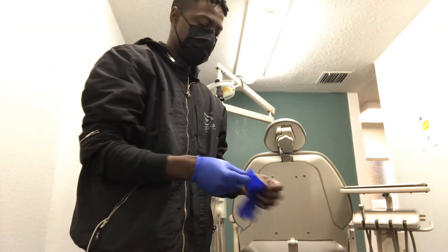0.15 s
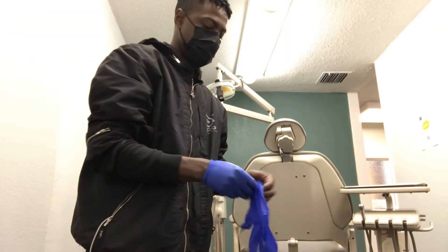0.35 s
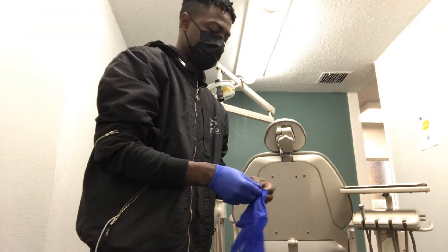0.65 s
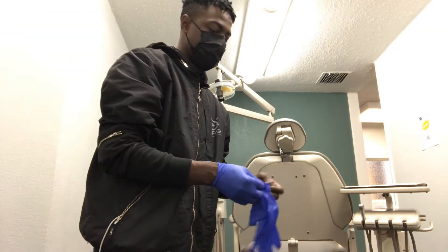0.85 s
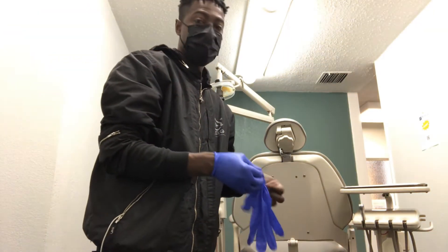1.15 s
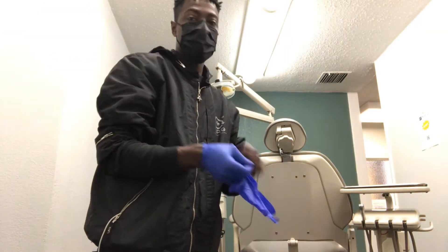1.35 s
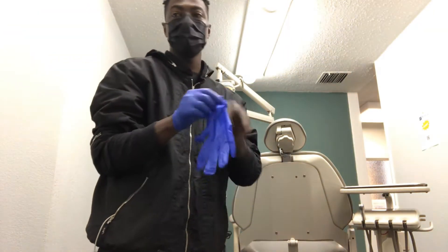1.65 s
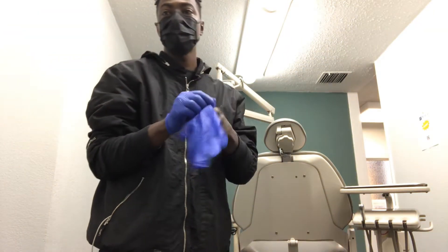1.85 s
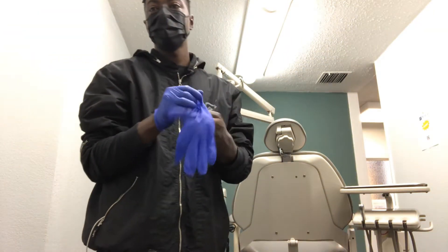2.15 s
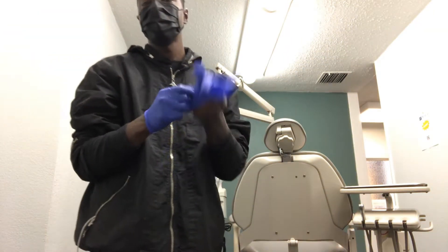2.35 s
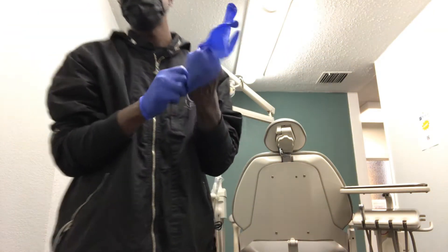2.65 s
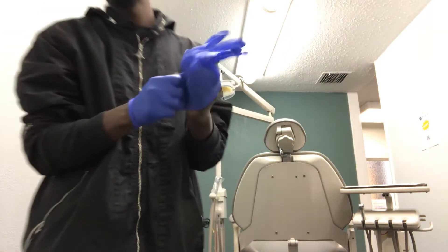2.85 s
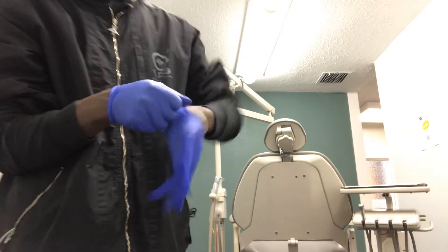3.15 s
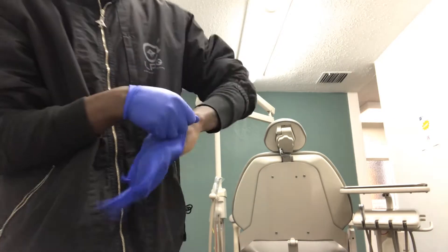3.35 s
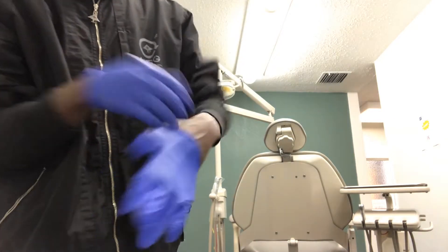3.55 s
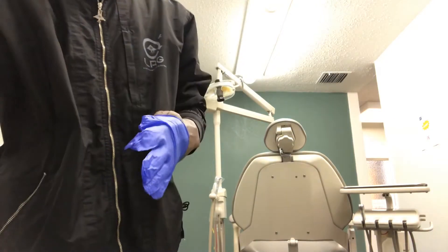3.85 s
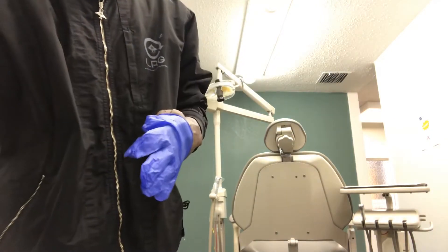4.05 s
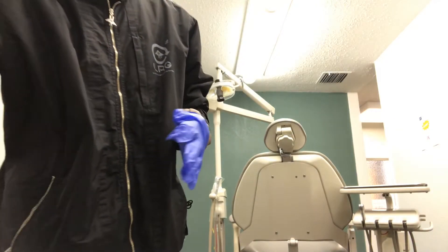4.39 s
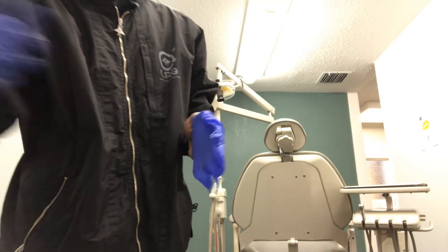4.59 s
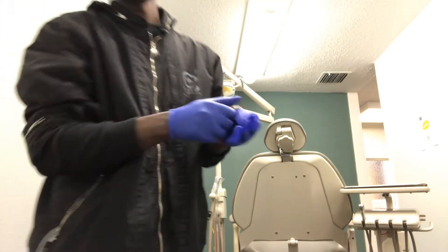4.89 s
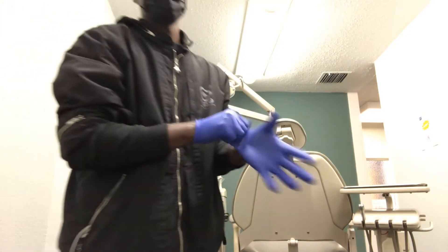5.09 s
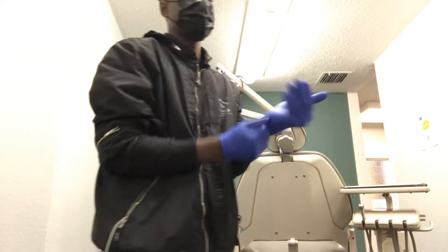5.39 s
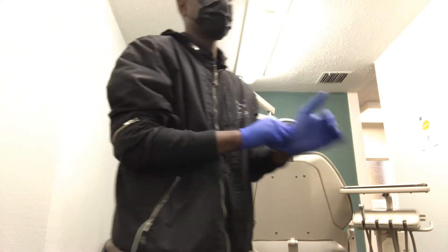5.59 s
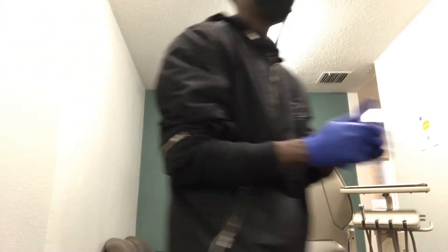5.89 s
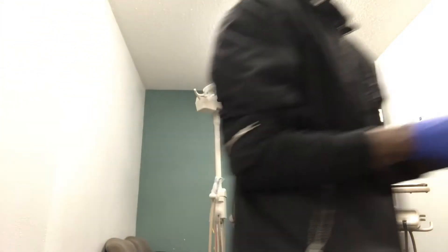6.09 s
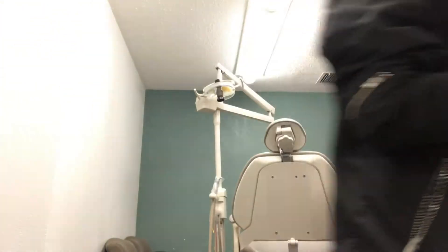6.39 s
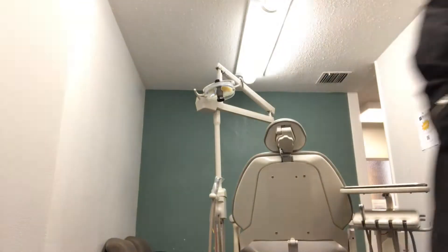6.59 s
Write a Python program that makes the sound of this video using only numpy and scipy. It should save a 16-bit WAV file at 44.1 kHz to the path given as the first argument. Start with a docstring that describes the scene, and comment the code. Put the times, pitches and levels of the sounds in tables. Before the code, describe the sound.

Thin rubber gloves rustle, rub and crinkle in a small hard room, with four sharp cuff snaps over low ventilation hum, then soft footfalls.

```python
"""A thin rubber glove is pulled onto a hand in a small, hard-walled room, over ventilation hum, moving
air and a low boom that swells and fades: tones, coloured noise and one wavering sine.
From the start sleeves swish and rubber rubs, hisses and soon crinkles: noise with stick-slip ticks and
short bursts. Later it judders (resonant noise), and the cuff snaps loud, lighter, loud, loud (dispersed
clicks), with two hollow puffs of air (sines). Last come two soft footfalls (low resonant noise)."""
import sys
import numpy as np
from scipy import signal
from scipy.fft import rfft, irfft, next_fast_len
from scipy.io import wavfile
from scipy.ndimage import uniform_filter1d, map_coordinates

SR = 44100
rng = np.random.default_rng(int(sys.argv[2]) if len(sys.argv) > 2 else 0)


def put_to_file(sound):
    """Save the sound as 16-bit audio at rate SR, in the file named by the first command-line argument."""
    columns = np.atleast_2d(sound).T  # one column per channel
    safe = np.clip(columns, -1, 1)
    whole_steps = np.round(safe * 32767)
    wavfile.write(sys.argv[1], SR, whole_steps.astype(np.int16))


N = 296793

# spectra of loose rubber, taut rubber and dull cloth or scuffing: freq_hz, density_db (per Hz, relative)
RUBBER = [(400, -52), (1100, -6), (1900, 2), (2800, 1), (3800, 0.5), (5000, -3), (6300, -5.5),
          (8000, -16.5), (10500, -26.5), (16000, -59)]
TAUT = [(3000, -31), (6000, 0), (8000, -3.5), (10300, -5.5), (13000, -1.5), (15500, -5)]
DULL = [(150, -4.5), (250, -1), (650, 0), (1400, 1.5), (2200, -5.5), (4000, -10.5), (9000, -73)]


def amp(db):
    """Amplitude ratio of a level in dB."""
    return 10 ** (np.asarray(db) / 20)


def unit(x):
    """x at rms 1."""
    return x / np.sqrt(np.mean(x ** 2) + 1e-20)


def along(points, hz):
    """Interpolate (Hz, value) points on a log frequency axis."""
    point_hz, value = np.transpose(points)
    return np.interp(np.log(hz + 1), np.log(point_hz + 1), value)


def wobble(rate_hz):
    """Smooth random curve through rate_hz normally distributed knots a second."""
    knots = rng.standard_normal(int(N * rate_hz / SR) + 4)
    return map_coordinates(knots, [np.arange(N) * rate_hz / SR])


def filtered(x, response):
    """x times a response of frequency, in the spectrum."""
    size = next_fast_len(N + SR // 2)
    return irfft(rfft(x, size) * response(np.fft.rfftfreq(size, 1 / SR)), size)[:N]


def coloured(x, spectrum):
    """x shaped by a spectrum, at rms 1."""
    return unit(filtered(x, lambda hz: amp(along(spectrum, hz))))


def pulse(spectrum, size=2048):
    """Minimum-phase pulse, the sharpest causal one with this spectrum, at energy 1."""
    hz = np.fft.rfftfreq(size, 1 / SR)
    cepstrum = irfft(np.log(amp(along(spectrum, hz))))
    cepstrum[1:size // 2] *= 2
    cepstrum[size // 2 + 1:] = 0
    p = irfft(np.exp(rfft(cepstrum)))
    return p / np.linalg.norm(p)


def add(track, start_s, sound):
    """Mix a sound into the track, cut at the track's end."""
    part = track[round(start_s * SR):][:len(sound)]
    part += sound[:len(part)]


def room(x, wet_db, onset_s=0.00041):
    """x, a few early reflections and a diffuse tail whose bands decay at their own rates."""
    # wall decay: freq_hz, t60_s
    wall_decay = [(130, 0.53), (400, 0.28), (1000, 0.36), (2800, 0.3), (7500, 0.33), (14000, 0.27)]
    # starting level of the tail: freq_hz, gain_db
    wall_gain = [(150, 10.5), (600, 4.5), (2000, 1.5), (7500, 5.5), (12000, -0.5)]
    # reflections off the nearest surfaces: delay_s (nominal), level_db (relative to the tail)
    reflections = [(.0037, -20), (.0062, -8), (.0094, -19), (0.0147, -16)]
    hz, t, z = signal.stft(rng.standard_normal(SR * 2 // 3), SR, nperseg=256)
    decay_db = 60 * t / along(wall_decay, hz)[:, None]
    level_db = along(wall_gain, hz)[:, None] - decay_db
    tail = signal.istft(z * amp(level_db), SR, nperseg=256)[1]
    tail *= 1 - np.exp(-(np.arange(len(tail)) / SR / onset_s) ** 2)
    tail /= np.linalg.norm(tail)
    for delay_s, db in reflections:
        jitter = 1 + 0.11 * rng.uniform(-1.1, 1)  # each sound gets slightly different reflection delays
        add(tail, delay_s * jitter, amp(db) * np.ones(2) / 2)  # slightly dulled by the surface
    response = amp(wet_db) * tail
    response[0] += 1
    return signal.fftconvolve(x, response)


def contact(fade_s, flutter, grain_db, size=4096):
    """A click plus grainy fading flutter, levelled to a nearly flat spectrum, at energy 1."""
    fade = np.exp(-np.arange(size) / SR / fade_s)
    burst = rng.standard_normal(size) * fade * amp(grain_db * rng.standard_normal(size))
    burst *= np.sqrt(flutter) / np.linalg.norm(burst)
    burst[0] += np.sqrt(1 - flutter)
    for _ in range(4):  # level the spectrum while keeping the burst short
        flat = irfft(np.exp(1j * np.angle(rfft(burst))))
        burst = flat * fade ** 0.25
    return burst / np.linalg.norm(burst)


def resonate(x, hz, width_hz, size=4096):
    """x through one steep-sided (double-pole) resonance, at energy 1."""
    t = np.arange(size) / SR
    ring = t * np.exp(-1.5 * np.pi * width_hz * t) * np.sin(2 * np.pi * hz * t)
    y = signal.fftconvolve(x, ring)
    return y / np.linalg.norm(y)


def resonant_swells(rows, wet_db):
    """Each row is a short swell of noise sounding a resonance in the room."""
    out = np.zeros(N)
    for start_s, length_s, hz, width_hz, db in rows:
        count = int(length_s * SR)
        push = rng.standard_normal(count) * np.sin(np.pi * np.arange(count) / count)
        add(out, start_s, amp(db) * room(resonate(push, hz, width_hz), wet_db))
    return out


def hum():
    """Steady tones of motors and mains."""
    # freq_hz, level_db (rms)
    tones = [(49.7, -53), (59.1, -49.5), (119.9, -55), (199.5, -70.5), (211.5, -70)]
    t = np.arange(N) / SR
    return sum(amp(db) * unit(np.sin(2 * np.pi * (hz * t + rng.random()))) for hz, db in tones)


def ventilation(level_db=-51.5):
    """Moving air: steady noise, mostly low."""
    # freq_hz, density_db (per Hz, relative)
    air_spectrum = [(20, -51), (30, -26), (42, 13), (70, -5.5), (125, 3), (180, -6), (270, -9.5),
                    (400, -13), (700, -18), (1400, -24), (3000, -37.5), (6500, -31.5), (10000, -39.5),
                    (16000, -56)]
    return amp(level_db) * coloured(rng.standard_normal(N), air_spectrum)


def boom(boom_hz=129, wander_hz=4, rest_db=-52.5, waver_db=1.5):
    """A low room resonance: a sine that swells, lingers between swells and wavers in pitch."""
    # start_s, length_s, top_db (rms of the swell at its top)
    boom_swells = [(0.126, 0.13, -36.5), (0.24, 0.47, -44.5), (0.766, 0.12, -41), (0.926, 0.16, -35.5),
                   (1.063, 0.28, -38), (1.945, 0.16, -44), (2.602, 0.091, -31), (3.932, 0.18, -36.5),
                   (4.221, 0.054, -42), (4.38, 0.27, -40.5), (4.598, 0.13, -36.5), (5.186, 0.13, -40),
                   (5.7, 0.19, -43), (6.556, .2, -41.5)]
    t = np.arange(N) / SR
    swell = np.zeros(N)
    for start_s, length_s, db in boom_swells:
        swell += amp(db) * np.sin(np.pi * np.clip((t - start_s) / length_s, 0, 1))
    strength = np.hypot(swell, amp(rest_db + waver_db * wobble(9.6)))
    pitch_hz = boom_hz + wander_hz * wobble(14)
    return strength * unit(np.sin(2 * np.pi * np.cumsum(pitch_hz) / SR))


def footfalls():
    """Soft steps while walking off: low resonant noise swells."""
    # start_s, length_s, pitch_hz, width_hz, energy_db (dry)
    steps = [(5.96, 0.35, 55, 25, -12.5), (6.415, 0.053, 277, 132, -17)]
    return resonant_swells(steps, wet_db=-8.5)


def puffs():
    """The hand drives air out of the glove with a soft, hollow note: a sine under an arch."""
    out = np.zeros(N)
    # start_s, peak_db, pitch_hz, length_s
    puff_rows = [(2.599, -30, 112.6, 0.043), (3.983, -38.5, 267, 0.09)]
    for start_s, db, hz, length_s in puff_rows:
        t = np.arange(int(length_s * SR)) / SR
        add(out, start_s, amp(db) * np.sin(np.pi * t / length_s) * np.sin(2 * np.pi * hz * t))
    return out


def judders():
    """Rubber judders over the skin and sounds a stretched patch: resonant noise swells."""
    # start_s, length_s, pitch_hz, width_hz, energy_db (dry)
    judder_rows = [(2.466, 0.023, 1910, 250, -14), (2.53, 0.041, 1420, 900, -11.5),
                   (2.616, 0.013, 2010, 400, -20), (3.231, 0.0156, 2570, 447, -12.5),
                   (3.685, 0.034, 3600, 600, -31), (4.71, 0.052, 1500, 300, -14),
                   (5.002, 0.031, 1300, 500, -17.5), (5.084, 0.036, 1000, 300, -17.5)]
    return resonant_swells(judder_rows, wet_db=-8)


def slips(rate_hz, spread_db, share):
    """Tiny stick-slip ticks of unequal size, a share of the power, on smooth friction noise."""
    size = amp(spread_db * np.minimum(rng.standard_normal(N), 2))
    ticks = (rng.random(N) < rate_hz / SR) * rng.choice([-1, 1], N) * size
    return np.sqrt(share) * unit(ticks) + np.sqrt(1 - share) * rng.standard_normal(N)


def patchy(x, depth_db):
    """The colour of x shifts from moment to moment as the film changes shape."""
    z = signal.stft(x, nperseg=512)[2]
    field = uniform_filter1d(rng.standard_normal(z.shape), 7, 0)  # smooth over frequency
    field = uniform_filter1d(field, 9, 1)  # smooth over time
    return unit(signal.istft(z * amp(depth_db * unit(field)), nperseg=512)[1][:N])


def pulls(attack_s=0.023, arch_db=2.5, fade_db_per_s=254):
    """Rub and hiss strengths: each pull takes hold, arches over its middle and dies away."""
    # start_s, length_s, rub_db, hiss_rel_db (taut rubber relative to the rub, before the hiss trim)
    pull_rows = [(0.012, .14, -62.5, -3.5), (0.334, 0.074, -64, -1.5), (0.75, 0.2, -65.5, -6),
                 (0.961, 0.055, -60.5, 0.5), (1.057, 0.26, -59.5, -2.5), (1.568, 0.16, -73, -5),
                 (1.715, .11, -52.5, -9.5), (1.82, 0.26, -62.5, -2.5), (2.102, .17, -59.5, -5),
                 (2.269, 0.2, -57, -2), (2.42, 0.16, -53, -5.5), (2.803, 0.21, -60, 0.5),
                 (2.943, .055, -54, -5.5), (3.074, 0.16, -55.5, -3), (3.274, .22, -55.5, -7.5),
                 (3.56, 0.22, -62.5, -4), (4.53, 0.41, -68.5, -2), (4.696, 0.067, -49, -4),
                 (4.816, 0.28, -58, -5), (4.978, .11, -48.5, -6.5), (5.08, 0.11, -51.5, -15),
                 (5.202, 0.098, -55, -3), (5.387, 0.077, -52, -2), (5.568, 0.21, -62, 0),
                 (5.792, .11, -52, -11.5), (5.924, 0.21, -70.5, 6)]
    rub_power, hiss_power = np.zeros(N), np.zeros(N)
    t = np.arange(SR) / SR
    for start_s, length_s, db, taut_db in pull_rows:
        curve_db = -arch_db * (2 * np.minimum(t / length_s, 1) - 1) ** 2
        fade_db = -fade_db_per_s * np.maximum(t - length_s, 0)
        strength = np.minimum(t / attack_s, 1) * amp(db + curve_db + fade_db)
        add(rub_power, start_s, strength ** 2)
        add(hiss_power, start_s, (amp(taut_db) * strength) ** 2)
    return np.sqrt(rub_power), np.sqrt(hiss_power)


def sliding():
    """Cloth swishes; rubber creeps over skin in tiny slips and hisses when pulled taut."""
    # how briskly the arms move: time_s, move_db (before the swing is widened)
    arm_rows = [(0.0, -56.5), (0.19, -59), (0.62, -64.5), (1.37, -57.5), (2.13, -59.5), (2.42, -52),
                (2.55, -55), (2.64, -48.5), (2.9, -54), (3.24, -55), (4.09, -58.5), (4.22, -62.5),
                (4.44, -59.5), (4.65, -55), (4.95, -52.5), (6.0, -56), (6.47, -53), (6.73, -54.5)]
    arm_s, move_db = np.transpose(arm_rows)
    arm_db = np.interp(np.arange(N) / SR, arm_s, move_db)
    swing = 1.06  # the swish swings wider than the movement
    arm = amp(arm_db.mean() + swing * (arm_db - arm_db.mean()))
    pull, taut = pulls()

    sleeve = amp(1.6 * wobble(21)) * coloured(slips(rate_hz=400, spread_db=1, share=0.13), DULL)
    grip_db = 1.2 * wobble(45)  # the grip catches and lets go
    friction = room(slips(rate_hz=500, spread_db=6, share=0.45), wet_db=0)[:N]
    folds = room(slips(rate_hz=20, spread_db=2, share=1), wet_db=-6)[:N]  # small folds tick at random
    rub = amp(grip_db) * patchy(coloured(friction, RUBBER), depth_db=0.5)
    rub += amp(-7.5) * coloured(folds, RUBBER)
    hiss_trim_db = 3.5
    hiss = amp(hiss_trim_db + 0.93 * grip_db)
    hiss *= coloured(slips(rate_hz=3500, spread_db=9, share=0.14), TAUT)

    # arm movement and pulls drive each layer together; the sleeve is dragged along with each pull
    sleeve_strength = np.hypot(amp(-1.5) * arm, amp(-5.5) * pull)
    rub_strength = np.hypot(amp(-9.5) * arm, pull)
    hiss_strength = np.hypot(amp(-19.5) * arm, taut)
    return sleeve_strength * sleeve + rub_strength * rub + hiss_strength * hiss


def crinkles(trim_db=-3.5, scuff_db=-3, fizz_db=-7):
    """A fold lets go with a tick, and the film around it crumples for a moment."""
    # start_s, fade_s (nominal), level_db (before trim_db), bright_db (trades dull scuff for hiss)
    crinkle_rows = [(1.1002, 0.0015, -19.5, 4.5), (1.206, 0.0074, -22.5, 5), (1.3964, 0.02, -14.5, 3.5),
                    (2.0978, .001, -18, 2.5), (2.445, 0.0064, -14, -2.5), (2.4689, .006, -13.5, 0.5),
                    (2.5448, .0058, -16, 13), (2.6198, .006, -23, 2), (2.682, 0.0045, -16.5, 4),
                    (2.909, 0.023, -23, -14.5), (3.1292, .0035, -17.5, -1.5), (3.2358, 0.0053, -10, 6),
                    (3.512, 0.0011, -11, 6.5), (3.8719, 0.0027, -20, 1), (3.901, 0.0041, -14, -4),
                    (3.997, .006, -29, 2), (4.214, .004, -32, 8), (4.221, .018, -26.5, -4.5),
                    (4.711, 0.019, -13.5, -5.5), (4.7192, 0.0042, -9, 0), (4.747, 0.029, -17, -7),
                    (5.0048, 0.0022, -20, -4), (5.0102, 0.0017, -17.5, -8.5), (5.0853, 0.0024, -12.5, -3),
                    (6.3504, 0.013, -24.5, -8.5)]
    out = np.zeros(N)
    scuff, rub, fizz = pulse(DULL), pulse(RUBBER), pulse(TAUT)
    for start_s, fade_s, db, bright_db in crinkle_rows:
        parts = [(scuff, scuff_db - bright_db), (rub, 0), (fizz, fizz_db + bright_db)]
        for colour, part_db in parts:
            tick = signal.fftconvolve(contact(fade_s, flutter=0.926, grain_db=2.5), colour)
            add(out, start_s, amp(db + part_db + trim_db) * room(tick, wet_db=-5.5))
    return out


def dispersed(x, lag_s, knee_hz):
    """The film carries high notes fastest: the lows of a slap leave it lag_s later."""
    size = 2 * len(x)
    hz = np.fft.rfftfreq(size, 1 / SR)
    cycles = lag_s * knee_hz * (1 - np.exp(-hz / knee_hz))
    return irfft(rfft(x, size) * np.exp(-2j * np.pi * cycles))[:len(x)]


def snaps(wet_trim_db=-2.5):
    """The stretched cuff slaps the skin and flutters against it for a moment."""
    # start_s, level_db (dry), fade_s (nominal), flutter (0-1, nominal), wet_db (before wet_trim_db)
    snap_rows = [(2.691, 5, 0.0034, 0.74, -2.5), (3.4639, -3, 0.0015, 0.8, -5.5),
                 (3.9428, 5.5, 0.0005, 0.4, -1.5), (5.4752, 2.5, 0.00046, 0.3, -3.5)]
    # cuff spectra, by how it is stretched and where it lands: freq_hz, density_db (per Hz, relative)
    tight = [(60, -12), (250, -10), (420, 0), (700, -7.5), (1020, -0.5), (1450, -13.5), (1900, 3.5),
             (2650, -13), (3800, -5.5), (4800, -14.5), (8000, -11.5), (9500, -16), (11500, -19),
             (15000, -22)]
    light = [(60, -39), (300, -18), (750, -2), (1450, 2), (2500, -4), (3400, -4.5), (4600, -6.5),
             (5800, -1.5), (7500, -16), (10300, -16.5), (15000, -8.5)]
    slack = [(60, -4), (200, -3.5), (420, 3.5), (600, 4), (970, 4), (1200, 0.5), (1450, 0.5), (2300, -6.5),
             (3000, -19), (3600, -33), (6000, -61), (12000, -69)]
    flat = [(60, -24), (220, -18), (400, -1.5), (600, 1.5), (900, -3.5), (1340, 2.5), (1950, -3.5),
            (2700, 2.5), (3800, -3), (4700, -19.5), (6000, -12.5), (8900, -21.5), (12000, -42),
            (15500, -34)]
    out = np.zeros(N)
    for row, colour in zip(snap_rows, [tight, light, slack, flat]):
        start_s, db, fade_s, flutter, wet_db = row
        slap = signal.fftconvolve(contact(fade_s, flutter, grain_db=-0.5), pulse(colour))
        slap = dispersed(slap, lag_s=0.00126, knee_hz=2410)
        add(out, start_s, amp(db) * room(slap, wet_db + wet_trim_db))
    return out


def scene():
    """Sum of the background, the footfalls and the glove, as one channel."""
    background = hum() + ventilation() + boom()
    glove = puffs() + judders() + sliding() + crinkles() + snaps()
    return (background + footfalls() + glove)[None]


def record(dry):
    """The recorder rounds off the highest peaks and keeps nothing above its band limit."""
    ceiling, top_hz = 0.42, 15900  # ceiling as a share of full scale
    rounded = dry / (1 + (dry / ceiling) ** 4) ** (1 / 4)
    return np.array([filtered(x, lambda hz: hz < top_hz) for x in rounded])


dry = scene()
out = record(dry)
put_to_file(out)
```